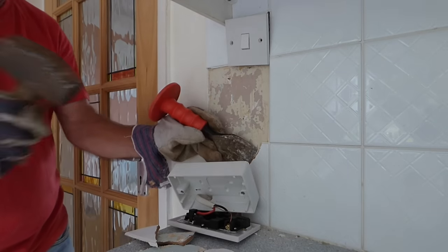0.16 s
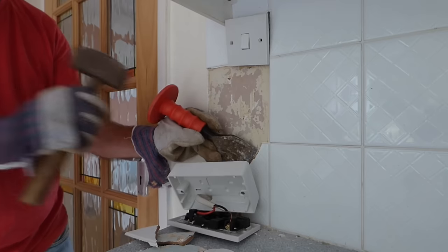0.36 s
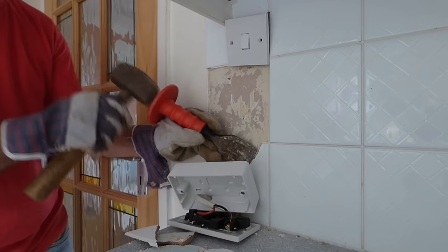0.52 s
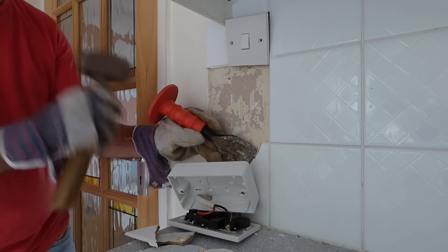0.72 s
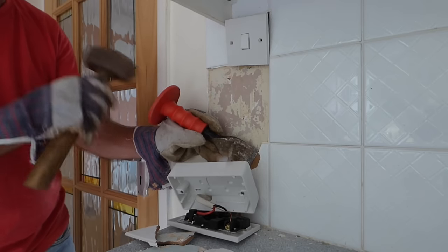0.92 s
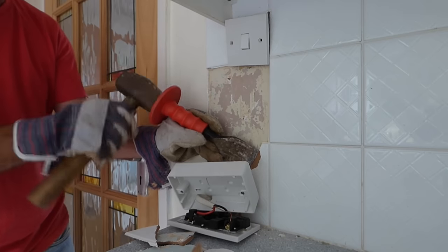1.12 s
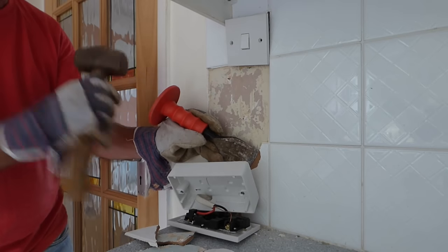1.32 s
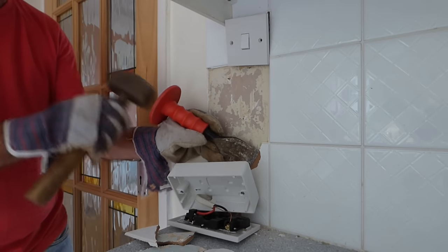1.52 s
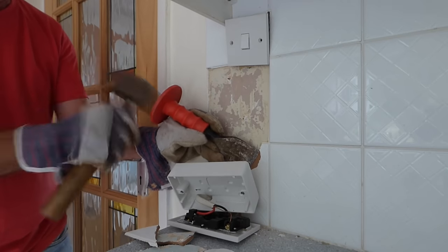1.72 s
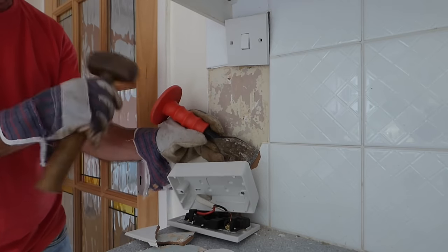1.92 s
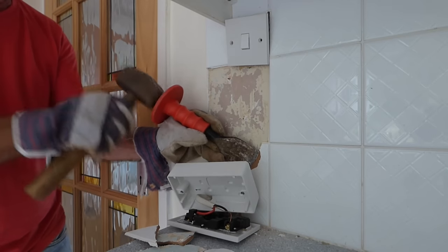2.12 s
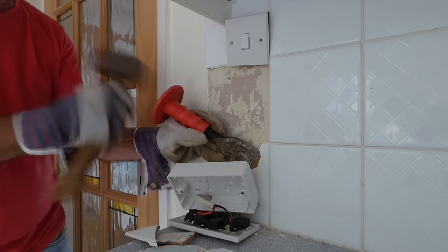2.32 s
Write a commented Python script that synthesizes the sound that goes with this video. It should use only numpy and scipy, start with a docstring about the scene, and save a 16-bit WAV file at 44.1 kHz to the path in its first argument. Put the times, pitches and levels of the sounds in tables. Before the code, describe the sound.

Soft hollow knocks and a short gritty drag, then six sharp metallic chisel blows about three per second, tile fragments ticking between the second and third; hard-walled echoing room, heard close in stereo with overloaded peaks.

```python
"""Chiselling off a wall tile

A club hammer strikes a hand-held steel chisel set behind a wall tile in a bare, echoing kitchen.
Something hollow is knocked and dragged before the blows, and knocked again just before the third.
After the second blow tile chips tick on the worktop and one rings a socket box. Steel, wall, chips and box
are sums of dying sine waves; breaking, scraping and room tone are coloured noise.
A camera's close microphone pair clips on the blows."""
import sys
import numpy as np
from scipy import signal
from scipy.fft import rfft, irfft
from scipy.io import wavfile
from scipy.ndimage import uniform_filter1d

SR = 44100
rng = np.random.default_rng(int(sys.argv[2]) if len(sys.argv) > 2 else 0)


def log_audio(samples):
    """Write samples as a 16-bit WAV file to the path given in sys.argv[1]."""
    # one column per channel
    frames = np.atleast_2d(samples).T
    # limit to full scale, then quantise
    limited = np.clip(frames, -1, 1)
    pcm = np.round(limited * 32767).astype(np.int16)
    wavfile.write(sys.argv[1], SR, pcm)


def how_loud(loudness_db):
    """Turn decibels into a plain amplitude multiplier (0 dB gives 1, 20 dB gives 10)."""
    steps = np.asarray(loudness_db, float) / 20
    return 10 ** steps


N = 103635  # length in samples

# The gloved hand damps steel, and chips are damped too: 60 dB within at most so many cycles.
MOST_CYCLES = 140


def along(points, hz):
    """Read a curve of (Hz, value) points on a logarithmic frequency axis."""
    f, v = np.transpose(points)
    return np.interp(np.log(hz + 1), np.log(f + 1), v)


def unit(x):
    """Scale to rms 1."""
    return x / np.sqrt(np.mean(x ** 2) + 1e-20)


def hiss(colour, alike, size):
    """Stereo noise of rms 1: the balance of mid and side sets how alike left and right are."""
    hz = np.fft.rfftfreq(size, 1 / SR)
    turn = np.arccos(np.clip(along(alike, hz), -1, 1)) / 2
    spectra = rfft(rng.standard_normal((2, size))) * how_loud(along(colour, hz))
    mid, side = irfft(spectra * [np.cos(turn), np.sin(turn)], size)
    return unit(np.array([mid + side, mid - side]))


def ring(modes, attack_s):
    """Damped sine waves set going together, each at a slightly new level at every contact."""
    scatter_db = 1.0
    t = np.arange(SR // 4) / SR
    hz, db, t60 = np.transpose(modes)[:, :, None]
    db = db + scatter_db * rng.standard_normal(db.shape)
    waves = how_loud(db - 60 * t / np.abs(t60)) * np.sin(2 * np.pi * hz * t)
    return waves.sum(0) * (1 - np.exp(-t / attack_s))


def crack(db, t60, colour):
    """A short noise burst of breaking and grit: rows for left port, right port and the room."""
    # Likeness of the burst at the two ports. Each row: frequency in Hz, left-right likeness.
    crack_alike = [(150, 0.028), (400, 1), (700, 0), (1200, .1), (2000, 0.27), (6000, 0.93), (13000, 0.89)]
    size = SR // 4
    t = np.arange(size) / SR
    burst = hiss(colour, crack_alike, size=size) * how_loud(db - 60 * t / t60) * (1 - np.exp(-t / 0.00013))
    # Summed over all directions, the burst gives the room an even pulse of about equal energy.
    pulse = irfft(how_loud(along(colour, np.fft.rfftfreq(size, 1 / SR))), size)
    pulse = np.roll(pulse, SR // 200)
    same_energy = np.sqrt(t60 * SR / (2 * np.log(1000)) / size)
    return np.vstack([burst, unit(pulse) * how_loud(db) * same_energy])


def room_tone():
    """The steady sound of the kitchen: quiet coloured noise."""
    # Colour of the room tone. Each row: frequency in Hz, level in dB before scaling to rms 1.
    air = [(25, 12.5), (70, -15), (140, -6.5), (210, -5), (290, -7), (440, -3.5), (620, -17.5), (830, -6.5),
           (1500, -23), (4000, -23), (10000, -20.5), (14000, -32), (15500, -32)]
    # Likeness at the two ports. Each row: frequency in Hz, left-right likeness.
    air_alike = [(60, 1), (240, 0.96), (950, 0.2), (3770, 0.61), (15000, 0.34)]
    return how_loud(-51) * hiss(air, air_alike, size=N)


def room(x):
    """The kitchen's answer: it builds up, then each frequency dies at its own speed."""
    # Dying away of the echo. Each row: frequency in Hz, time to fall 60 dB in seconds.
    decay = [(100, 1), (300, 0.56), (1000, 0.58), (3000, 0.52), (6000, 0.61), (10000, 0.49), (15000, 0.37)]
    # Colour of the echo. Each row: frequency in Hz, level in dB before scaling.
    room_colour = [(100, -3), (250, -8), (290, 0.5), (340, -1.5), (430, -5), (480, -4.5), (520, 2.5),
                   (580, -1.5), (1500, 2.5), (2600, 0), (4000, 3), (8000, -3.5), (15000, 5)]
    # Likeness at the two ports. Each row: frequency in Hz, left-right likeness.
    room_alike = [(100, 0.81), (300, 0.96), (600, 0.82), (850, 0.6), (1250, 0.38), (2000, .75),
                  (5500, 0.71), (8500, 0.71), (12000, 0.15)]
    level_db, build_s = -1, 0.004
    size = SR
    hz, t, z = signal.stft(hiss(room_colour, room_alike, size=size), SR, nperseg=256)
    fade = how_loud(-60 * t / along(decay, hz)[:, None])
    tail = signal.istft(z * fade, SR, nperseg=256)[1][:, :size]
    tail = tail * (1 - np.exp(-(np.arange(size) / SR / build_s) ** 2))
    tail = tail / np.linalg.norm(tail[0])
    return how_loud(level_db) * signal.fftconvolve(x[None], tail, axes=1)[:, :size]


def drag():
    """A gritty scrape around the first knocks: noise whose level flutters at random."""
    # Swell and fade of the scrape. Each row: time in seconds, level in dB before the flutter.
    swell = [(0.04, -80), (0.053, -50), (0.12, -48), (0.152, -43.5), (0.2, -58), (0.26, -85)]
    # Colour of the scrape. Each row: frequency in Hz, level in dB before scaling to rms 1.
    drag_colour = [(120, -51), (200, -22), (532, 3), (800, -9), (1120, -3), (3380, -16.5), (4030, -16),
                   (14000, -23)]
    s, db = np.transpose(swell)
    flutter = how_loud(2 * unit(uniform_filter1d(rng.standard_normal(N), size=60)))  # 2 dB rms
    level = how_loud(np.interp(np.arange(N) / SR, s, db, -150, -150))
    return level * flutter * hiss(drag_colour, [(100, 0.72)], size=N)


def knock(db):
    """A soft knock on something hollow: its modes ring, with a little grit."""
    # Modes of the hollow thing. Each row: frequency in Hz, mean level in dB, time to fall 60 dB in seconds.
    hollow = [(140, -16.5, 0.063), (313, -6, 0.052), (464, -6, 0.052), (538.6, 3, 0.022),
              (652, -5.5, 0.029), (1276, -4, 0.0078)]
    # Colour of the grit. Each row: frequency in Hz, level in dB before scaling to rms 1.
    knock_grit = [(300, -10), (1300, 0.5), (2200, 1), (3200, -16), (8000, -5), (14000, -31)]
    sound = ring(hollow, .0015) + crack(-17, 0.018, knock_grit)
    return how_loud(db) * sound * how_loud([[0], [0], [-4]])  # less goes to the room


def ping(db):
    """The socket box rings when a chip hits it: slow-starting modes, sent weakly into the room."""
    # Modes of the box. Each row: frequency in Hz, mean level in dB, longest time to fall 60 dB in seconds.
    box = [(1000, -6, 0.094), (1339, -4.5, 0.25), (1914, 3, 0.26), (1934, -2.5, 0.18)]
    longest_s, to_room_db = .17, -15
    modes = [(f, level, min(t60, longest_s)) for f, level, t60 in box]
    return how_loud([[db], [db], [db + to_room_db]]) * ring(modes, 0.009)


def chip(db, hz):
    """A tile chip ticks on landing: short modes at multiples of its pitch, with a noise burst."""
    # Modes of a chip. Each row: multiple of the pitch, mean level in dB, longest time to fall 60 dB in seconds.
    chip_modes = [(.74, -4.5, 0.032), (0.999, 7.5, .025), (1.16, 3, 0.008), (1.3, -24, 0.0072),
                  (1.52, -22, 0.0069)]
    modes = [(hz * k, level, min(t60, MOST_CYCLES / hz)) for k, level, t60 in chip_modes]
    colour = [(1500, -20), (0.29 * hz, -8), (hz, 0), (16000, -16)]
    return how_loud(db) * (ring(modes, .0002) + crack(1.5, 0.034, colour))


def blow(db, favour_hz, second_hz, sharp_db, drive_db):
    """Where and how squarely the hammer lands decides which modes ring loudest."""
    # Chisel and hammer head. Each row: frequency in Hz, mean level in dB before the lift,
    # longest time to fall 60 dB in seconds.
    chisel = [(3114, -25, 0.036), (3860, -9, 0.0074), (4900, -7.5, 0.0096), (5616, -16, 0.018),
              (6320, -17.5, 0.031), (7155, -10.5, 0.022), (8440, -11.5, .017), (9200, -16, 0.015),
              (10340, -13.5, 0.0098)]
    # Tile and wall. Each row: frequency in Hz, mean level in dB before the drive, time to fall 60 dB in seconds.
    wall_modes = [(162, -28, 0.046), (290, -20, 0.032), (434, -19, 0.029), (741, -10.5, 0.0086),
                  (1277, -19.5, 0.0091), (1797, -22, 0.023), (2017, -10.5, 0.015)]
    # Colour of breaking glaze and grit. Each row: frequency in Hz, level in dB before the lift and scaling.
    crack_colour = [(150, -11), (350, -1), (900, -1.5), (2000, -1.5), (2800, -1.5), (5000, 0), (8500, 2),
                    (11000, -6), (12200, -4), (16000, -30)]
    reach_octaves, favour_db, pivot_hz = .1, 4, 2500
    steel_to_room_db = -3  # the ring is beamed along the wall more than into the room

    def lift(f):
        """Extra dB around the favoured pitches, plus a treble tilt for a sharp contact."""
        favour = sum(favour_db * np.exp(-(np.log2(f / c) / reach_octaves) ** 2)
                     for c in (favour_hz, second_hz))
        return favour + sharp_db * np.log2(1 + f / pivot_hz)

    modes = [(f, level + lift(f), min(t60, MOST_CYCLES / f)) for f, level, t60 in chisel]
    steel = ring(modes, 0.00071) * how_loud([[0], [0], [steel_to_room_db]])
    wall = how_loud(drive_db) * ring(wall_modes, 0.001)
    hz = np.geomspace(crack_colour[0][0], crack_colour[-1][0], num=150)
    lifted = np.transpose([hz, along(crack_colour, hz) + lift(hz)])
    return how_loud(db) * (steel + wall + crack(-3, 0.0074, lifted))


def ports(x):
    """The microphone ports cut the deep bass and the top; the right one is a little weaker."""
    low_cut = signal.butter(3, 95, "high", fs=SR, output="sos")
    high_cut = signal.butter(4, 15600, fs=SR, output="sos")
    left_db = 0.13
    return signal.sosfilt(np.vstack([low_cut, high_cut]), x) * how_loud([[left_db], [-left_db]])


def limiter(x):
    """Gain control: it grips just after a peak, and its peak reading falls at a steady rate."""
    threshold_db, slope, attack_s, release_db_per_s = -15, 0.27, 0.006, 58.5
    fall = release_db_per_s * np.arange(N) / SR
    peak_db = np.maximum.accumulate(20 * np.log10(np.abs(x).max(0) + 1e-9) + fall) - fall
    gain_db = -slope * np.maximum(peak_db - threshold_db, 0)
    keep = np.exp(-1 / (attack_s * SR))
    return x * how_loud(signal.lfilter([1 - keep], [1, -keep], gain_db))


def scene():
    """Each contact sounds directly, off near walls and through its own room answer, over room tone."""
    # Hammer blows. Each row: start in seconds, strength in dB, favoured and second favoured pitch in Hz,
    # sharpness in dB per doubling of (1 + frequency / pivot), drive into tile and wall in dB.
    blows = [(0.4997, 5.5, 5650, 3560, -3.5, 1.5), (0.8277, 4, 6530, 10500, -1, -3),
             (1.1612, 5.5, 8200, 4150, -0.1, -1), (1.4659, 6, 8440, 8720, 0.1, -1.5),
             (1.7943, 3.5, 8970, 5220, 1.46, 1.5), (2.1022, 4, 4900, 6470, 0.04, -5.5)]
    # Landing chips. Each row: start in seconds, level in dB, pitch in Hz.
    chips = [(0.8512, -13.5, 9150), (1.006, -23.5, 9200), (1.024, -19, 8130), (1.109, -25, 8100),
             (1.141, -26, 6350)]
    # A chip hits the socket box. Each row: start in seconds, level in dB.
    pings = [(1.024, -22.5)]
    # Hollow knocks. Each row: start in seconds, level in dB.
    knocks = [(0.048, -27), (0.056, -34.5), (0.068, -28), (0.1545, -14.5), (0.163, -21.5), (0.180, -25.5),
              (0.194, -34.5), (0.209, -49), (0.245, -52), (1.142, -24.5), (1.156, -22.5)]
    # First echoes. Each row: delay in seconds, level in dB.
    near_walls = [(.0045, -13), (.0085, -14.5), (.013, -27.5)]
    paths = [(0.00084, 0.011)] + near_walls  # the direct sound comes first
    out = np.zeros((2, N + SR))
    for table, source in ((knocks, knock), (pings, ping), (chips, chip), (blows, blow)):
        for s, *how in table:
            x = source(*how)
            k = round(s * SR)
            for delay_s, db in paths:
                out[:, k + round(delay_s * SR):][:, :x.shape[1]] += how_loud(db) * x[:2]
            out[:, k:k + SR] += room(x[2])
    return out[:, :N] + drag() + room_tone()


def band_limit(x):
    """A steep low-pass at the top of the band."""
    return signal.sosfilt(signal.butter(12, 16570, fs=SR, output="sos"), x)


def record(dry):
    """The camera limits the sound, clips it softly and adds a small constant offset."""
    clip_top, hardness, offset = 1.0, 3, -.0029
    x = limiter(ports(dry))
    clipped = x / (1 + np.abs(x / clip_top) ** hardness) ** (1 / hardness)
    return band_limit(clipped + offset)


dry = scene()
out = record(dry)
log_audio(out)
```